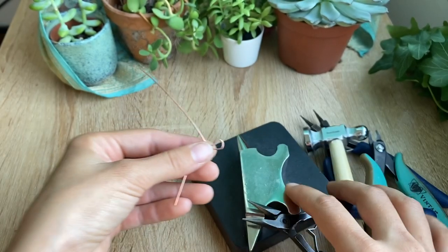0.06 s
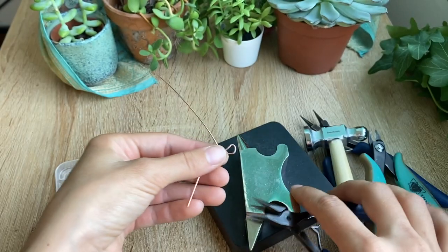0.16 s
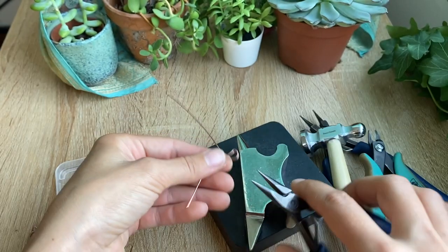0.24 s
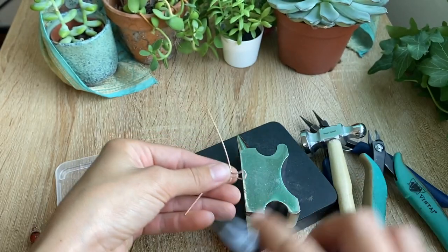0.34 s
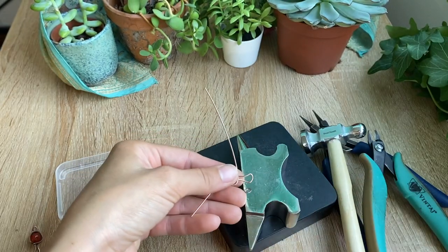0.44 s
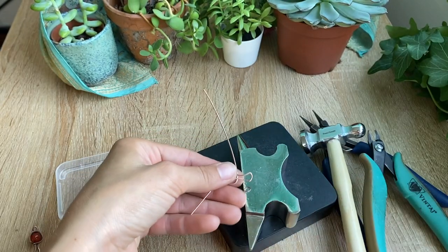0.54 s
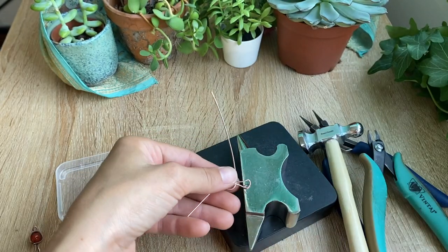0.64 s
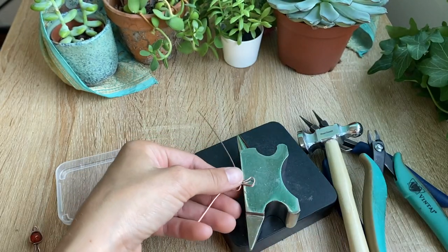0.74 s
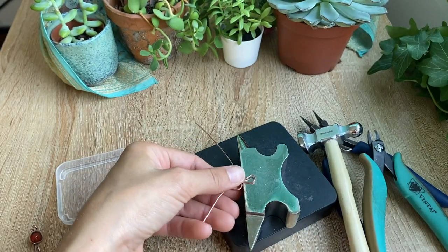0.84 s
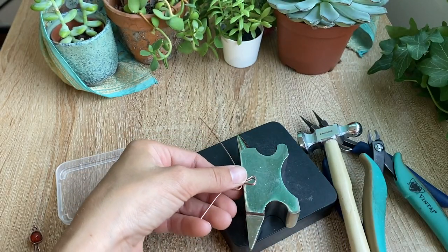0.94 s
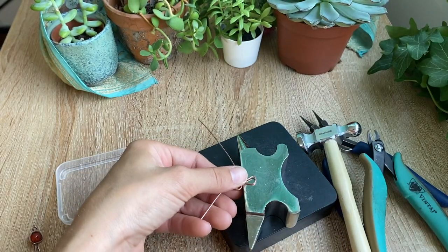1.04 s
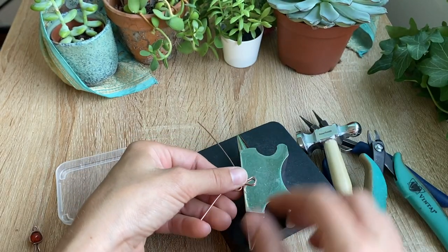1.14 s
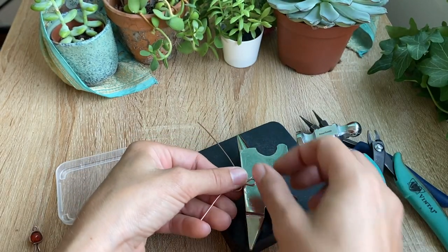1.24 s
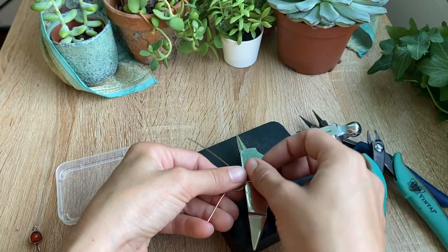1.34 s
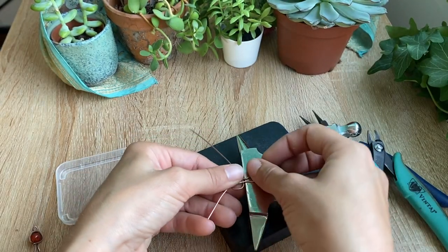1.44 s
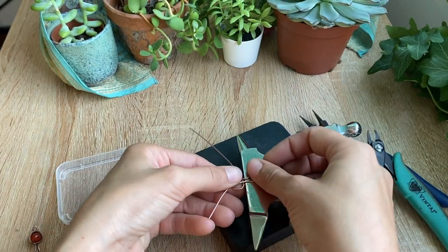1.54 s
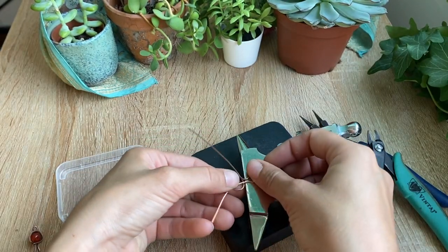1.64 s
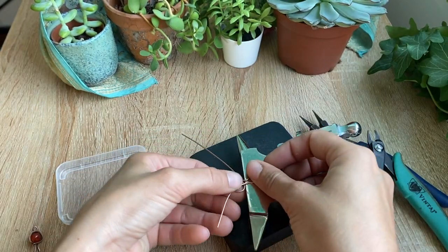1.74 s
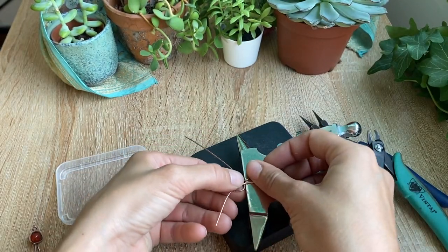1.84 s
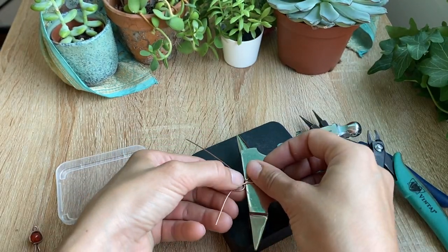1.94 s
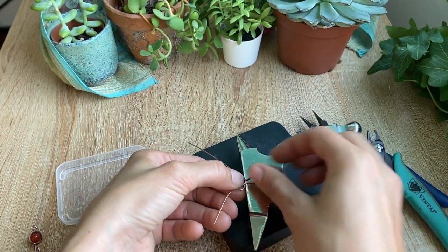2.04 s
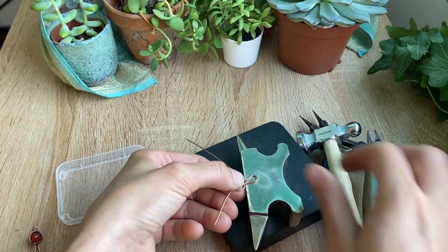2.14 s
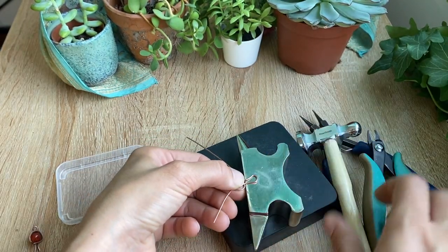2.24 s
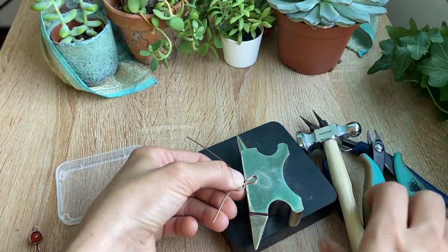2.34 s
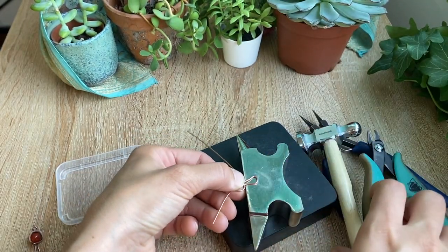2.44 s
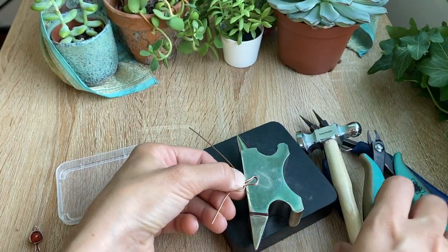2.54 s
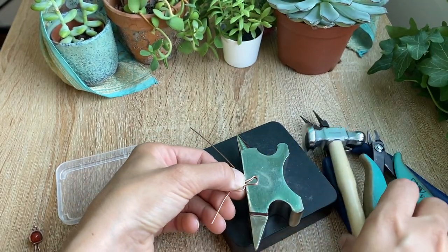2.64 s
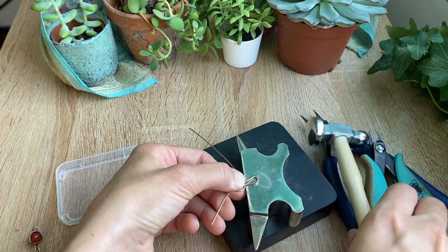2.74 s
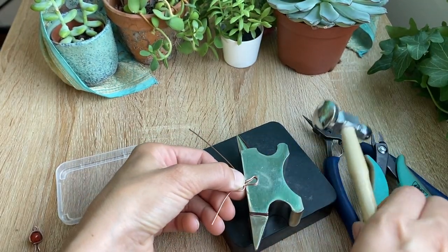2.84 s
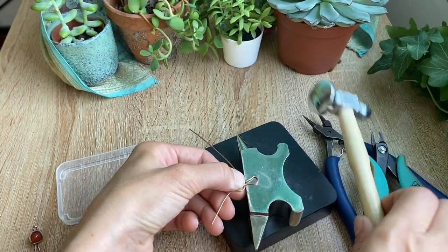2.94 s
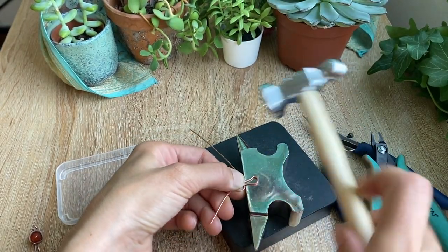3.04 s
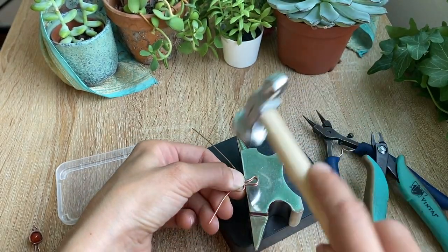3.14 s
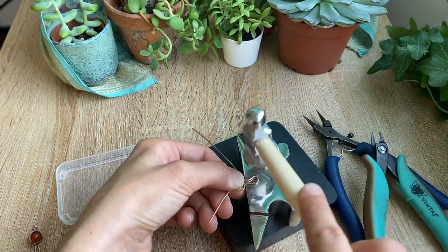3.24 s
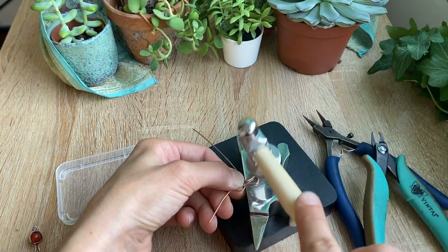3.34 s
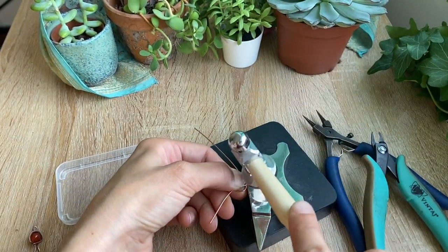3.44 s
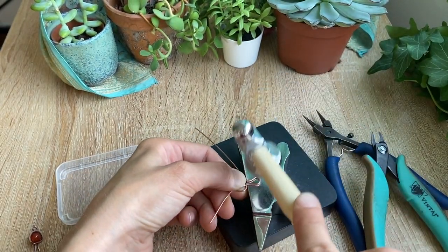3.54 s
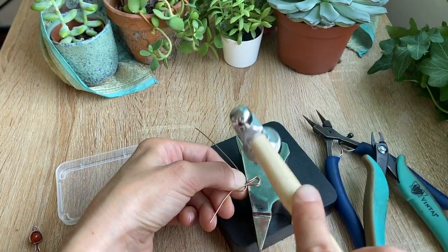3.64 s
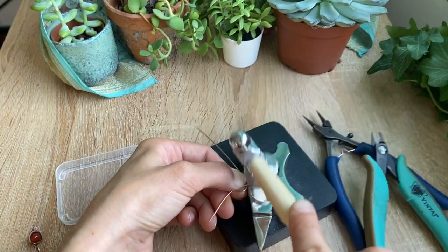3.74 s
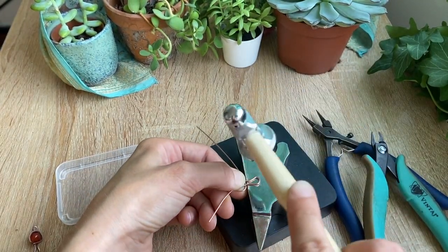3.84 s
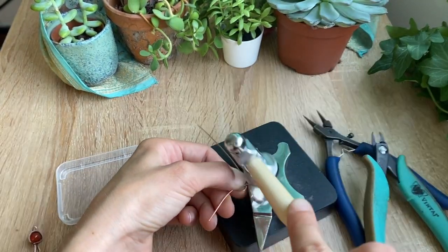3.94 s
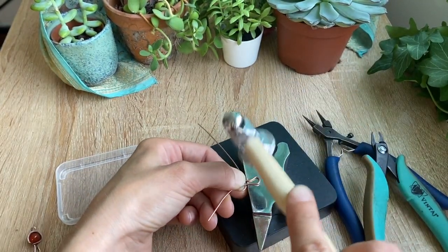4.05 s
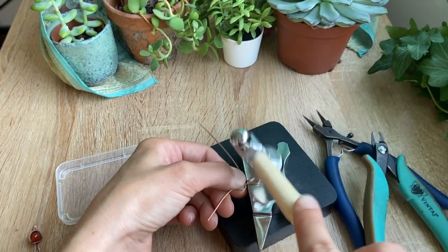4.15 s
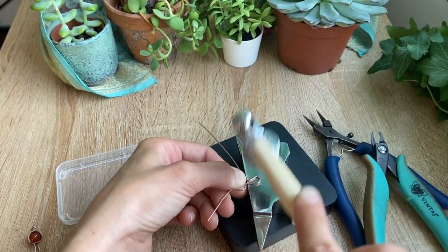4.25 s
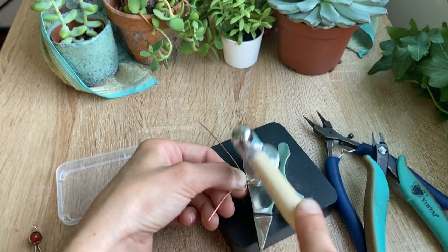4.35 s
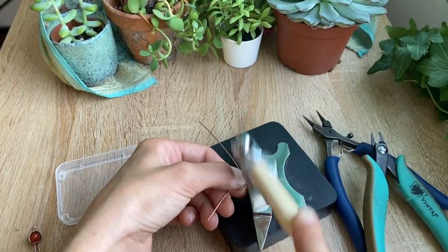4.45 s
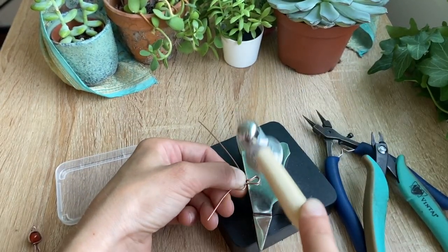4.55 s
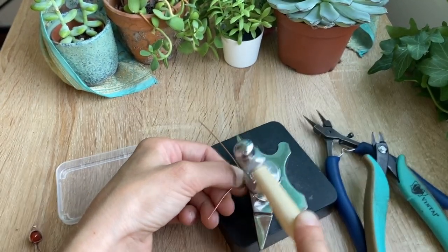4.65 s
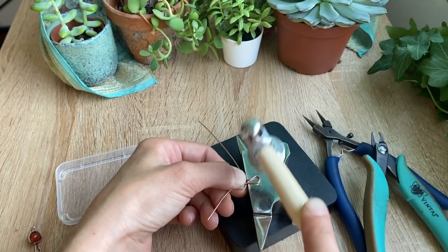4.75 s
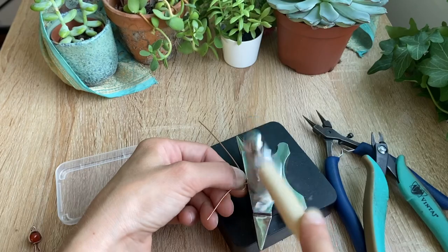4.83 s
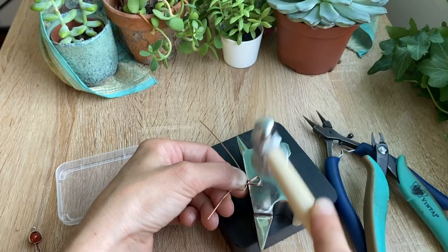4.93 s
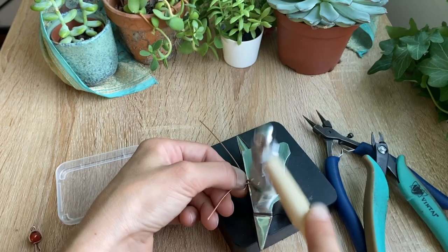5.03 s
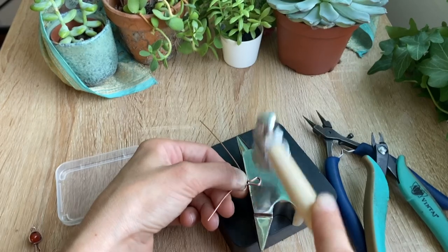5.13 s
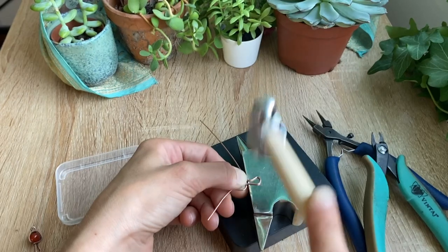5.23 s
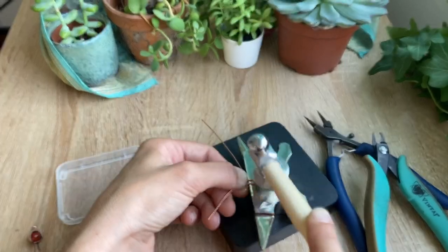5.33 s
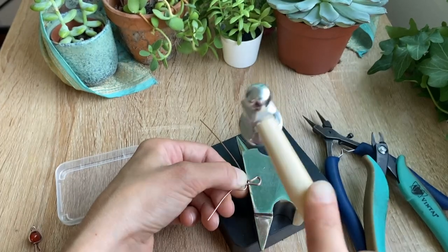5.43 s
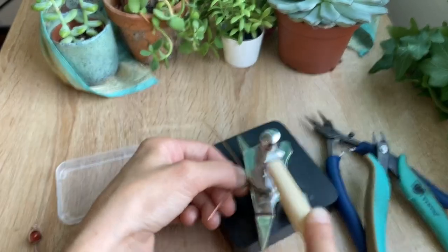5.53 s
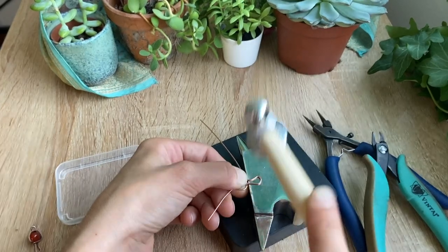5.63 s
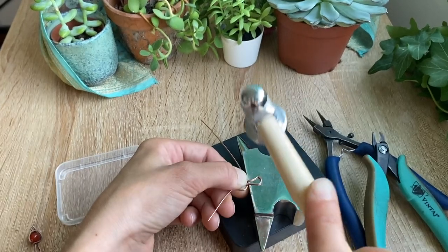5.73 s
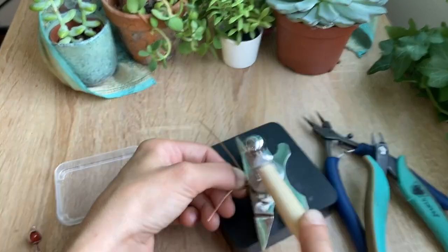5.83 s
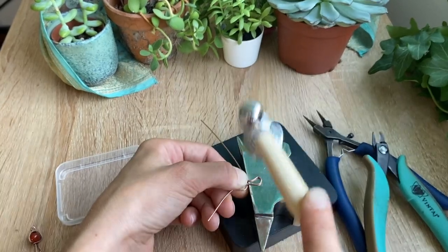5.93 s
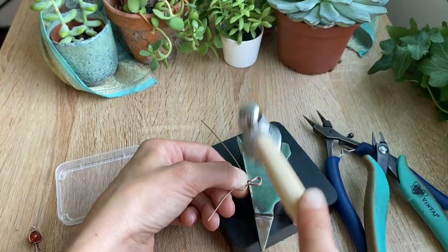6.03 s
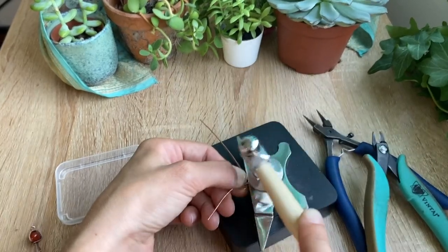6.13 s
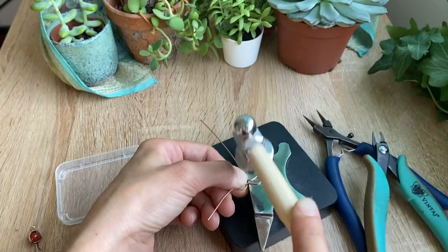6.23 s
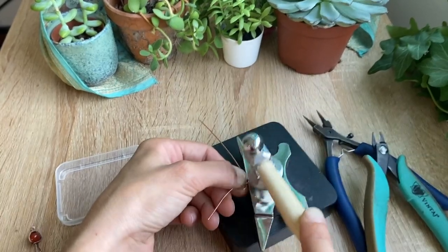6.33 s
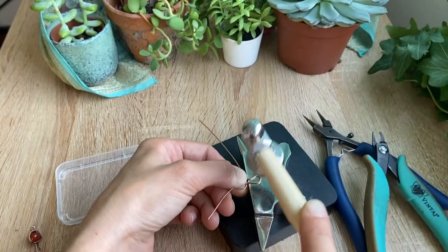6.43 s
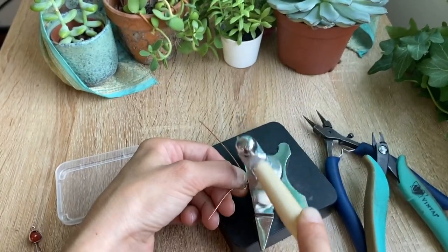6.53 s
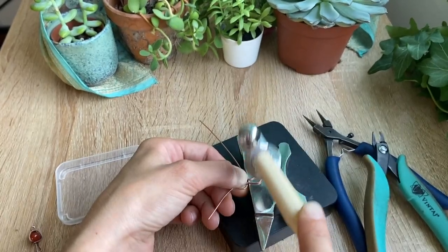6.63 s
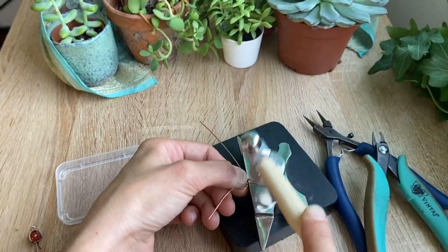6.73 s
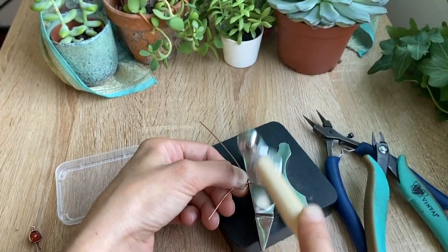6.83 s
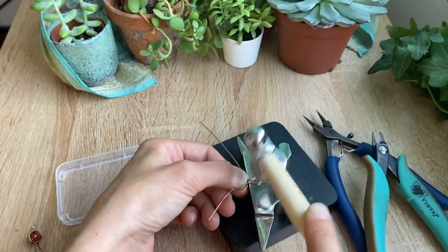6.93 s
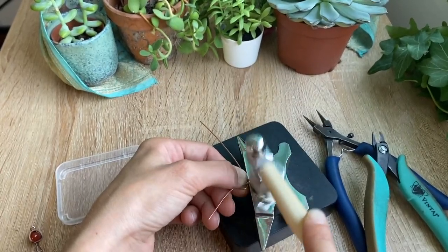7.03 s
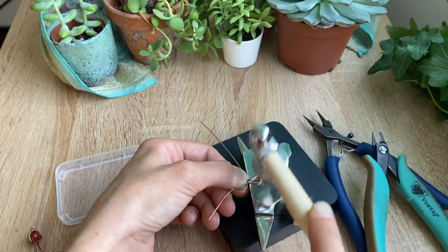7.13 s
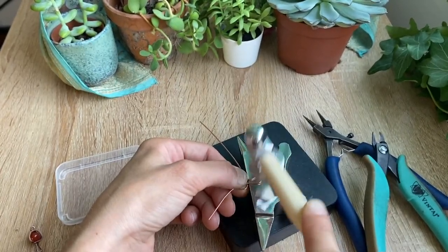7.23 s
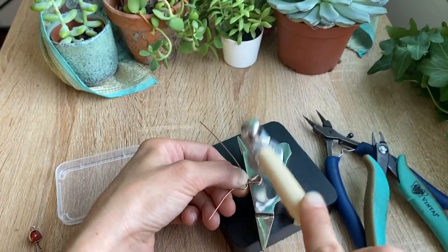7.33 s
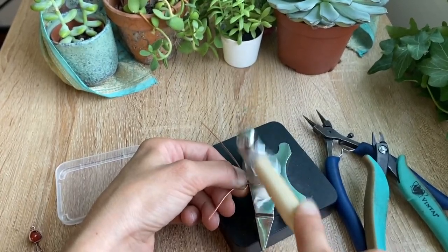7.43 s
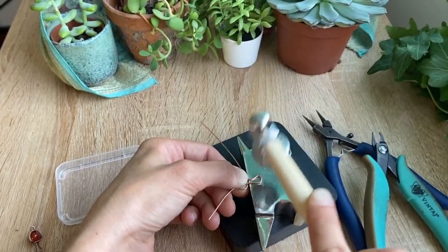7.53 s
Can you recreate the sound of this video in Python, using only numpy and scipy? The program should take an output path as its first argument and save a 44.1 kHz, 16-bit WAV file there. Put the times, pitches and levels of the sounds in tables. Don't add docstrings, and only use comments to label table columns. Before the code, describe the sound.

Close up at a wooden craft table in a quiet room, tools and hands make uneven hollow knocks with small metallic clicks during the first second. Soft handling and low bumps follow, then a hammer is picked up with a brief ring. After a near-silent moment, it taps wire on a padded steel anvil about five times a second, each blow a sharp crack, a very short ring and a woody thud.

```python
import sys
import numpy as np
from scipy import signal
from scipy.fft import rfft, irfft, next_fast_len
from scipy.io import wavfile
from scipy.ndimage import uniform_filter1d

SR = 44100
rng = np.random.default_rng(int(sys.argv[2]) if len(sys.argv) > 2 else 0)


def generate_wav(sig):
    pcm = np.round(np.clip(np.atleast_2d(sig).T, -1, 1) * 32767).astype(np.int16)
    wavfile.write(sys.argv[1], SR, pcm)


def to_linear_factor(level_db):
    exponent = np.asarray(level_db, float) / 20
    return 10 ** exponent


N = 334278

# [t/s, sharpness level/dB, horn ring level/dB, anvil ring level/dB, first touch level/dB]
BLOWS = [(3.7314, -38.5, -56, -66.5, -16), (3.928, -31.5, -72, -77, -7.5), (4.1059, -30.5, -64, -71, -13.5),
         (4.296, -32.5, -53, -61, -8), (4.4722, -33.5, -55.5, -62.5, -9.5), (4.6488, -33, -61, -57, -20.5),
         (4.8343, -32, -47.5, -67, -7), (5.034, -30.5, -38, -59.5, -37), (5.261, -29, -34.5, -57.5, -15),
         (5.514, -29, -34.5, -56.5, -29), (5.8104, -29, -44.5, -57, -17.5), (6.0737, -31, -49, -62.5, -9),
         (6.2834, -36.5, -52, -58, -27), (6.4761, -33.5, -50.5, -54, -10.5), (6.663, -33, -46, -57.5, -18),
         (6.853, -34, -44, -62.5, -19), (7.035, -38.5, -52, -70, -23), (7.2497, -41.5, -63, -87, -30),
         (7.4399, -38, -57.5, -71, -20)]
# [t/s, face ring level/dB, push level/dB, rebound level/dB, level of the
# faint haze just ahead/dB]
BLOW_LEVELS = [(3.7314, -74.5, -1.6, -5, 2), (3.928, -61.5, -0.5, -4.5, -2.5), (4.1071, -56, 0.1, -2, -3.0),
               (4.2961, -62.5, 1.5, -2, -8), (4.4727, -64.5, -0.8, 6.7, 4), (4.6493, -56, -1.8, 3.5, 5.5),
               (4.8354, -56.5, -0.7, 5.7, 0.5), (5.036, -54.5, -0.5, -1.5, 1.5),
               (5.2629, -50.5, -0.5, -0.5, -2), (5.5159, -46.5, -2.2, 7, 0.5), (5.8087, -56, -1, -2, -0.5),
               (6.0746, -57.5, -0.6, 5.5, -4.5), (6.2831, -57.5, -1.6, 1, 5.5), (6.4767, -58, -1, -0.5, -3.0),
               (6.6638, -56.5, -1.8, -6, -4), (6.8518, -48.5, -0.4, -2.5, -3.0), (7.0354, -78.5, -1, -1, 3.5),
               (7.2474, -84, -0.6, -1.3, 1.5), (7.4385, -65, 2, -2, 1)]
# [t/s, level/dB]
BRUSHES = [
    (3.72, -46.5),
    (4.4607, -35.5),
    (4.824, -32.5),
    (5.251, -32.5),
    (6.0623, -38.5),
    (7.022, -45),
    (7.237, -39),
    (7.428, -35.5),
]
# [t/s, peak level/dB, weight level/dB, hardness level/dB, edge level/dB]
KNOCKS = [(0.052, -46.5, -21, -20.5, -13), (0.076, -47, -7.5, -20, -20), (0.13, -36, -10, -14, 0),
          (0.171, -35.5, -14.5, -17.5, -1), (0.231, -17, -11.5, -3, -7), (0.368, -64.5, 0.5, -9, -13),
          (0.513, -16.5, -15, -4.5, -6), (0.632, -40, -0.5, -3, -13), (0.651, -37.5, -7.5, -15, -15),
          (0.731, -14, -23, -4.5, -1), (0.804, -45, 5, -8.5, -12.5), (0.832, -17.5, -21.5, -13.5, -14),
          (0.934, -36, -3.5, -17, -25), (0.998, -15.5, -19, -5.5, -3.5), (1.091, -40.5, -8.5, -15, -18),
          (1.363, -64.5, 18, -41, -27), (1.778, -62, 2, -16.5, -15.5), (1.9, -64, -8.5, -25, -25),
          (2.182, -51.5, -7.5, -12, -15), (2.278, -31.5, -14, -24.5, -40), (2.354, -56.5, 14, -24.5, -30.5),
          (2.573, -50.5, -11, -21, -27), (2.656, -17.5, -27.5, -19, -24.5), (2.699, -56.5, 5.5, -5, 8.5),
          (2.821, -46.5, -18.5, -13.5, -4.5), (2.86, -43.5, -26, -29, -25),
          (2.958, -45.5, -16.5, -22.5, -24)]
# [t/s, peak level/dB, top level/dB, head ring level/dB, jaw ring level/dB]
TICKS = [
    (0.1305, -41.5, -54.5, -67.5, -34),
    (0.169, -36.5, -51.5, -63, -52),
    (0.2308, -47.5, -107, -84, -68),
    (1.369, -73.5, -92, -99.5, -76),
    (1.6476, -87.5, -91, -102, -83.5),
    (1.7834, -76.5, -92, -99, -81.5),
    (2.0867, -85, -100, -99, -75.5),
    (2.3557, -80.5, -102, -87, -82.5),
    (2.655, -50, -55.5, -51, -76),
    (2.8274, -77.5, -96, -74, -85),
]
# [t/s, level/dB, f/Hz, t60/s]
TOUCHES = [
    (0.1157, -56, 3060, 0.0039),
    (2.6975, -59, 2290, 0.018),
    (2.697, -57.5, 1140, 0.033),
    (2.936, -67, 4300, .005),
    (2.943, -67, 2300, .025),
    (2.9435, -71, 4020, .012),
    (2.9865, -67, 2000, .005),
    (3.0504, -69, 2980, .006),
]
# [t/s, level/dB, f/Hz, length/s]
BUMPS = [
    (2.374, -38.5, 62.5, 0.011),
    (2.42, -27, 60, 0.01),
    (2.443, -19, 99, 0.0053),
    (2.469, -25, 61.3, 0.0065),
    (2.594, -47, 70, 0.032),
    (2.452, -37.5, 212, 0.004),
    (2.458, -30.5, 37.3, 0.026),
]
# [t/s, level/dB]
STIR = [(0, -56.5), (.4, -47.5), (1.0, -69), (1.3, -51), (1.55, -60.5), (2.05, -66.5), (2.3, -55.5),
        (2.55, -51), (2.85, -53), (3.08, -62), (3.26, -69.5), (3.45, -77.5), (3.7, -100.5), (3.9, -65.5),
        (4.95, -59), (5.25, -55.5), (6.4, -61), (7.58, -65.5)]

# [f/Hz, t60/s, blow level/dB, knock level/dB,
# left-right level/dB, left lead/rad]
TABLE_MODES = [(70, 0.93, -31.5, -20, -0.5, 0.01), (99, 0.46, -24.5, -18, 0.5, 0.0089),
               (117.8, 0.19, -13, -10.5, -1, 0.054), (155.3, 0.22, -28, -2, 1.5, 0.24),
               (176.2, 0.12, -16, -10.5, -2.5, 0.16), (207.7, 0.13, -12, 0, 0.5, 1.2),
               (261.4, 0.1, -6.5, -16, -4.5, 0.19), (285.5, 0.15, -11.5, -4, 1.5, 0.72),
               (374.8, 0.066, -0.5, 7, 6, 0.15), (393, 0.058, -39.5, -7.5, 1.5, 1.4),
               (383.4, 0.51, -25.5, -28.5, 7, 0.23)]
MORE_TABLE_MODES = [(417.3, 0.032, 2, -8.5, -1.5, 0.11), (463.8, 0.081, -4, -5.5, 6.5, 2.1),
                    (521.2, 0.044, -10, 1, 0.5, 0.4), (605, 0.066, -7, -3.5, -1.5, 0.97),
                    (690, 0.023, -10.5, 2.5, 12.5, 0.57), (724.3, 0.064, -1.5, -3, -4, 2.13),
                    (860, 0.1, -6.5, -10.5, 2.5, 2.6), (916, 0.05, -1, -13.5, 0, 2.4), (1232, 0.03, -8.5, -25.5, 0, 0.3),
                    (1366, .03, -8.5, -26.5, -5, 0.59), (1402, 0.044, -14, -18.5, -9, 0.23),
                    (1817, 0.026, -14.5, -19, -7, 2.2), (339, 0.2, -19, -21.5, -2, 1.1),
                    (244.3, 0.058, -9, -12.5, -3, .3)]
TABLE = TABLE_MODES + MORE_TABLE_MODES
# [f/Hz, t60/s, level/dB]
ANVIL_RING = [(10500, 0.034, -36), (11750, 0.013, -0.1), (11700, .09, -30.5)]
HORN_RING = [(4060, 0.0028, -11.5), (4300, 0.008, -12.5), (6640, 0.0036, -5.5), (6840, 0.016, -26)]
PAD_RING = [(1346, 0.046, 3.5), (2407, 0.01, -1), (2970, 0.0052, -38)]
HAMMER_RING = [(14770, .2, -22), (14800, 0.19, -18.5), (15000, .03, -1), (15400, .009, -2.5),
               (14000, .006, -12.5)]
# [f/Hz, t60/s, level/dB]
PLIERS = [(2300, 0.037, -22), (3270, 0.0056, 1), (4600, .12, -39.5)]
PLIERS_TOP = [(10400, 0.015, -7.5), (11200, 0.009, -2), (14500, 0.02, -25.5)]
SPRING = [(4470, 0.08, -63), (4570, 0.1, -64)]
HEAD_RING = [(5800, 0.12, -11.5), (5990, 0.087, -5.5), (5930, 0.25, -7), (6330, .08, -0.5),
             (7650, 0.011, 3)]
# [f/Hz, t60/s, level/dB]
DRAG_RING = [(693, 0.058, 15), (1134, 0.066, 1), (2120, 0.037, -5), (3050, 0.022, -14), (4600, 0.033, -21),
             (6380, .012, -12)]

# [f/Hz, level/dB per Hz]
CRACK = [(50, -33.5), (200, 3.5), (600, 18.5), (1300, 10.5), (2300, 4.5), (3800, 0), (5200, -7),
         (6600, -11.5), (7800, -14.5), (9200, -39.5), (10500, -38.5), (12500, -22.5), (13500, -19.5),
         (16000, -32)]
CLACK = [(50, -16), (200, 19), (600, 25), (1200, 12.5), (2500, 1), (5000, -18), (7500, -26), (9500, -44),
         (12000, -31), (16000, -39.5)]
CLICK = [(150, -51), (600, -23), (1800, -4.5), (3000, 5.5), (5000, 5), (7500, 3), (9000, -13.5),
         (11000, -16.5), (13000, -13.5), (15500, -17)]
# [f/Hz, left lead/rad]
LEAD = [(200, 3.8), (900, 4.6), (1300, 0.33), (2000, 1), (3500, 0.25), (6500, 1.2), (9000, 0.68),
        (11500, 1.3), (15000, 1.4)]
# [f/Hz, t60/s]
ROOM_T60 = [(100, 1), (300, 0.12), (1000, 0.32), (3000, 0.35), (7000, 0.31), (11500, .3), (14800, 0.2)]
# [f/Hz, level/dB]
ROOM_GAIN = [(100, -20.5), (300, -4), (1000, -8.5), (1600, -5.5), (3000, -11), (5000, -10), (7000, -14),
             (8300, -14.5), (11500, -11.5), (14800, -10.5)]
# [f/Hz, correlation/1]
LIKENESS = [(60, 0.88), (200, 0.86), (500, 0.16), (1000, .01), (15000, .05)]
# [f/Hz, level/dB per Hz]
RUMBLE = [(15, -53), (25, -28), (48, 0), (70, -3.5), (102, 7.5), (140, -23.5), (200, -12.5), (260, -37.5),
          (440, -120)]
MURMUR = [(82, -32.5), (140, -11), (215, -2), (243, -17), (382, -2), (547, -26.5), (900, -36.5),
          (1170, -68), (1980, -120)]
HISS = [(410, -19.5), (700, -1.5), (1260, -7.5), (1460, -8.5), (1650, -11), (2210, -5.5), (2890, -13),
        (3150, -12.5), (7970, -19), (8900, -24), (10800, -18.5), (13000, -22)]
# [f/Hz, level/dB]
WHINES = [(1500, -102), (2220, -99), (2280, -99), (3000, -96.5), (3750, -107), (4500, -105)]
# [low f/Hz, high f/Hz]
EMPTY_BANDS = [(8600, 9550), (12600, 14100)]

CHANGE_S, CHANGE_FADE_S = 3.43, 0.0214
STRAY_DB = 1.5


def at_hz(points, hz):
    return np.interp(np.log(hz), np.log(np.array(points)[:, 0]), np.array(points)[:, 1])


def drift(rate):
    knots = rng.standard_normal(400)
    return np.interp(np.arange(N) / SR * rate, np.arange(400), knots)


def bands(size, low_hz, high_hz, shape):
    edges = low_hz * 2 ** np.arange(0, np.log2(high_hz / low_hz), 1 / 3)
    settle = 4000
    white, out = rng.standard_normal((3, 2, size + settle)), 0
    for k, (low, high) in enumerate(zip(edges, edges[1:])):
        band = signal.butter(2, [low, high], "band", fs=SR, output="sos")
        mid, side = signal.sosfilt(band, white[k % 3])[:, settle:]
        hz = np.sqrt(low * high)
        alike = np.clip(at_hz(LIKENESS, hz), -1, 1)
        out = out + shape(hz) * (np.sqrt(1 + alike) * mid + np.sqrt(1 - alike) * side * [[1], [-1]])
    return out


def background():
    t, out = np.arange(N) / SR, 0
    late = t > CHANGE_S
    stir_db = np.interp(t, *np.transpose(STIR))
    murmur_db = -66.5 + 0.64 * (stir_db + 57.5)
    opens = BLOWS[0][0]
    hiss_db = np.interp(t, [2.1, CHANGE_S, CHANGE_S + CHANGE_FADE_S, opens, opens + 0.087],
                        [-83, -80.5, -104, -104, -79.5])
    for level_db, spectrum, lumpy_db in [(stir_db, RUMBLE, 3.5), (murmur_db, MURMUR, 3.0), (hiss_db, HISS, 1.2)]:
        def shape(hz):
            duller_db = -9 * (hz > 4200) * late
            return to_linear_factor(at_hz(spectrum, hz) + lumpy_db * drift(12.0) + duller_db)
        noise = bands(N, spectrum[0][0], spectrum[-1][0], shape)
        out = out + to_linear_factor(level_db) * noise / noise.std()
    bright = signal.butter(4, (9600, 12600), "band", fs=SR, output="sos")
    top_hiss = signal.sosfilt(bright, rng.standard_normal((2, N)))
    whines = sum(to_linear_factor(db) * np.sin(2 * np.pi * hz * t) for hz, db in WHINES)
    return out + to_linear_factor(hiss_db - 6.5 - 22 * late) * top_hiss + (t < CHANGE_S) * whines


def emptied(x):
    hz = np.arange(N // 2 + 1) * SR / N
    keep = np.prod([(hz < low) | (hz > high) for low, high in EMPTY_BANDS], axis=0)
    return irfft(rfft(x) * keep, N)


def clicks(times, db):
    out = np.full(N, 1e-18)
    np.add.at(out, np.round(np.asarray(times) * SR).astype(int), to_linear_factor(db))
    return out


def ring(drive, hz, t60, rise_cycles, lead=0., pan_db=0.):
    turn = np.exp(2j * np.pi * hz / SR)
    swell = np.exp(-hz / (rise_cycles * SR))
    z = signal.lfilter([1 - swell], [1, -swell * turn], drive)
    z = signal.lfilter([1], [1, -to_linear_factor(-60 / (t60 * SR)) * turn], z)
    left = to_linear_factor(pan_db / 2) * (z * np.exp(.5j * lead)).imag
    right = to_linear_factor(-pan_db / 2) * (z * np.exp(-.5j * lead)).imag
    return np.array([left, right])


def table(times, db, luck, column, rise_cycles, flip, prompt_hz, late_cycles):
    out = 0
    for k, mode in enumerate(TABLE):
        hz, t60, _, _, pan_db, lead = mode
        if hz > 405.0:
            t60 = min(t60, 31 / hz)
        late = late_cycles * max(1 / hz - 1 / prompt_hz, 0)
        drive = clicks(times + late, db(hz) + mode[column] + luck[:, k])
        out = out + flip ** k * ring(drive, hz, t60, rise_cycles, lead, pan_db)
    return out


def snap(times, db, spectrum, length_ms, pan_db):
    pulse = clicks(times, db)
    envelope = signal.lfilter([0, 0.06], [1, -np.exp(-1000 / (length_ms * SR))], pulse)
    grit = envelope * rng.standard_normal(N)
    size = next_fast_len(N)
    hz, side = np.arange(1, size // 2 + 2) * SR / size, np.array([[.5], [-.5]])
    ports = to_linear_factor(at_hz(spectrum, hz) + side * pan_db) * np.exp(1j * side * at_hz(LEAD, hz))
    return irfft(rfft(pulse + grit, size) * ports, size)[:, :N]


def knocks():
    s, peak_db, weight_db, hard_db, edge_db = np.transpose(KNOCKS)
    boom_db, body_db = peak_db + weight_db, peak_db + hard_db
    clack_db = peak_db + edge_db - 21.5
    push_ms, bounce_ms = 5.6 - 0.28 * hard_db, 10.2
    luck = np.tile(STRAY_DB * rng.standard_normal((len(s), len(TABLE))), (3, 1))
    put_down = s < .45

    def strength(hz):
        db = np.array([at_hz([(150, b + 9), (350, p - 3), (650, m + 5), (1800, c + 25)], hz)
                       for b, p, m, c in zip(boom_db, peak_db, body_db, clack_db)])
        db = db - 6 * put_down * np.exp(-(np.log(hz / 286) / .12) ** 2)
        db = db + 15.5 * put_down * (hz == TABLE_MODES[-1][0])
        return np.r_[db - 8, db, db - 10.5]
    times = np.r_[s, s + push_ms / 1000, s + (push_ms + bounce_ms) / 1000]
    boom = table(times, strength, luck, column=3, rise_cycles=0.72, flip=0.96, prompt_hz=473.0, late_cycles=2.2)
    return snap(s, clack_db + 19.0, CLACK, length_ms=11.0, pan_db=-4.0), boom


def room(x):
    t, wet = np.arange(SR // 2) / SR, []
    for _ in range(2):
        echoes = bands(len(t), 75.4, 17000, lambda hz: to_linear_factor(at_hz(ROOM_GAIN, hz) - 60 * t / at_hz(ROOM_T60, hz)))
        echoes = to_linear_factor(-23.0) * echoes * np.clip((t - .001) / 0.00023, 0, 1)
        wet.append(signal.oaconvolve(x, echoes, axes=1)[:, :N])
    angle = 3.0 * drift(45)
    return np.cos(angle) * wet[0] + np.sin(angle) * wet[1]


def smear(x):
    rise_s = 0.003
    ahead = np.arange(-SR // 30, SR // 30 + 1) / SR
    grain = rng.standard_normal((2, len(ahead))) * np.exp(np.minimum(ahead, 0) / rise_s) * (ahead < 0)
    dull = signal.sosfilt(signal.butter(3, [620, 7500], "band", fs=SR, output="sos"), x)
    haze_db = np.interp(np.arange(N) / SR, *np.transpose(BLOW_LEVELS)[[0, 4]])
    return to_linear_factor(haze_db - 6) * signal.fftconvolve(dull, grain / np.sqrt(rise_s * SR), mode="same", axes=1)


def handling():
    t = np.arange(N) / SR
    start_s, length_s, slips_per_s = 2.823, 0.02, 500
    dragging = (t > start_s) * (t < start_s + length_s)
    slips = (rng.random(N) < slips_per_s / SR) * rng.standard_normal(N) * dragging + 1e-18
    drag = sum(to_linear_factor(db - 66.5) * ring(slips, hz, t60, 1.0, at_hz(LEAD, hz)) for hz, t60, db in DRAG_RING)
    touches = sum(ring(clicks([s], db), hz, t60, 0.9, at_hz(LEAD, hz)) for s, db, hz, t60 in TOUCHES)
    return drag + touches


def steel(times, db, modes, pan_db):
    luck = STRAY_DB * rng.standard_normal((len(times), len(modes)))
    return sum(ring(clicks(times, db + level_db + luck[:, k]), hz, t60, 2.5, at_hz(LEAD, hz), pan_db)
               for k, (hz, t60, level_db) in enumerate(modes))


def tools():
    s, peak_db, top_db, head_db, jaw_db = np.transpose(TICKS)
    click = snap(s, peak_db + 10.0, CLICK, length_ms=5.0, pan_db=-0.5)
    jaws = steel(s, jaw_db, PLIERS, pan_db=-5.0) + steel(s, top_db + 4.0, PLIERS_TOP, pan_db=-0.5)
    spring = steel([.236], 0, SPRING, pan_db=1.0)
    return click, jaws + spring + steel(s, head_db - 11.0, HEAD_RING, pan_db=-1.0)


def bumps():
    t = np.arange(N) / SR
    return sum(to_linear_factor(db) * np.exp(-.5 * ((t - s) / length) ** 2) * np.cos(2 * np.pi * hz * (t - s))
               for s, db, hz, length in BUMPS)


def hammer():
    s, peak_db, crack_db, anvil_db, touch_db = np.transpose(BLOWS)
    s = s + .0012
    _, face_db, push_db, back_db, _ = np.transpose(BLOW_LEVELS)
    table_db = -22 + 0.34 * (peak_db + 32) + push_db
    luck = np.tile(STRAY_DB * rng.standard_normal((len(s), len(TABLE))), (4, 1))
    brush_s, brush_db = np.transpose(BRUSHES)

    def strength(hz):
        db = table_db + 6.5 * (s > 5.4) / (1 + (hz / 133) ** 6)
        give_db = 10 * np.log10(1 + (hz / 430) ** 4)
        rebound_db = db - 5 + back_db - 60 * np.log(hz / 456) ** 2
        return np.r_[db + touch_db - give_db, db, rebound_db, brush_db - give_db]
    push_s = s - 0.0012
    times = np.r_[s - 0.005605, push_s, push_s + 0.012016, brush_s]
    boom = table(times, strength, luck[:len(times)], column=2, rise_cycles=0.76, flip=-1.0062,
                 prompt_hz=319.6, late_cycles=2.2 + 0.55)
    crack = snap(s, peak_db + 14.0, CRACK, length_ms=6.8, pan_db=-2)
    horn = steel(s, crack_db + 14.5, HORN_RING, pan_db=0.5)
    pad = steel(s, peak_db - 6.0, PAD_RING, pan_db=3.5)
    anvil = steel(s, anvil_db + 10.0, ANVIL_RING, pan_db=0.0)
    face = steel(s, face_db + 3, HAMMER_RING, pan_db=-1.0)
    bare = 0.04
    return crack + bare * horn, boom + (1 - bare) * horn + pad + anvil + face


def skid():
    start_s, end_s = 6.084, 6.19
    along = np.clip((np.arange(N) / SR - start_s) / (end_s - start_s), 0, 1)
    gate = np.sin(np.pi * along) * np.exp(-2.5 * along) * to_linear_factor(4.7 * drift(50.0) + 5.5)
    noise = rng.standard_normal((2, 2, N))
    low = signal.sosfilt(signal.butter(2, [10100, 12300], "band", fs=SR, output="sos"), noise[0])
    high = signal.sosfilt(signal.butter(2, [14300, 15700], "band", fs=SR, output="sos"), noise[1])
    return to_linear_factor(-68.5) * gate * (low + .8 * high)


def scene():
    contacts, rings = (sum(parts) for parts in zip(hammer(), knocks(), tools()))
    rings = rings + handling()
    near = contacts + rings
    faint = skid() + room(contacts + to_linear_factor(-13) * rings) + background()
    return near + smear(near) + emptied(faint) + bumps()


def ducking(t):
    starts = np.r_[-9, np.transpose(BLOWS)[0]]
    since = t - starts[np.searchsorted(starts, t) - 1]
    return to_linear_factor(-5 * (1 - np.exp(-since / 0.045)) * np.exp(-since / .08))


def limiting(dry, t):
    over_db = np.maximum(20 * np.log10(np.abs(dry).max(0) + 1e-9) + 19, 0) * (t > CHANGE_S)
    fall_db = 700.5 * t
    held_db = np.maximum.accumulate(np.roll(over_db, -60) + fall_db) - fall_db
    return to_linear_factor(-uniform_filter1d(held_db, size=60))


def band_limit(x):
    return signal.sosfilt(signal.butter(12, 16670, fs=SR, output="sos"), x)


def record(dry):
    t = np.arange(N) / SR
    back_s = CHANGE_S + CHANGE_FADE_S
    dip = np.interp(t, [CHANGE_S - .012, CHANGE_S, back_s, back_s + 0.011], [0.96, 0.029, 0.082, 0.99])
    return band_limit(dry * dip * ducking(t) * limiting(dry, t))


dry = scene()
out = record(dry)
generate_wav(out)
```